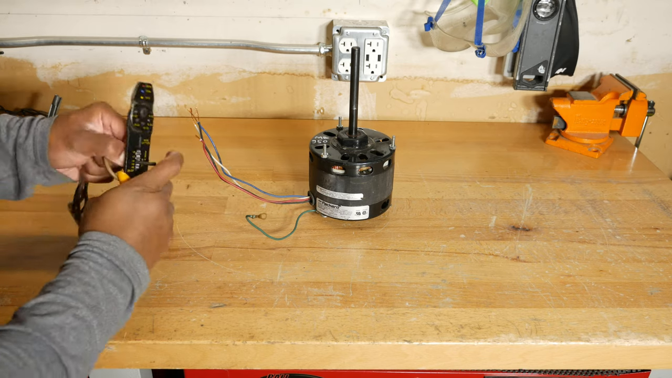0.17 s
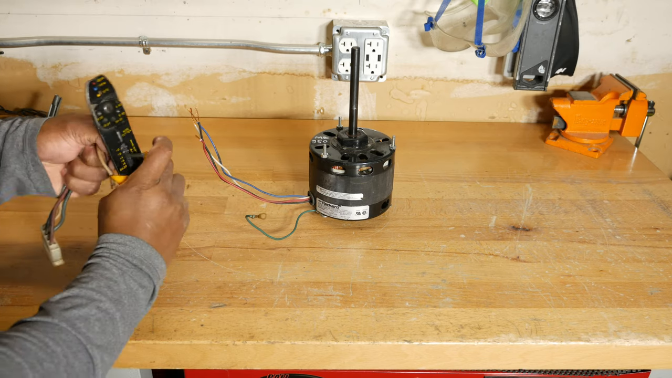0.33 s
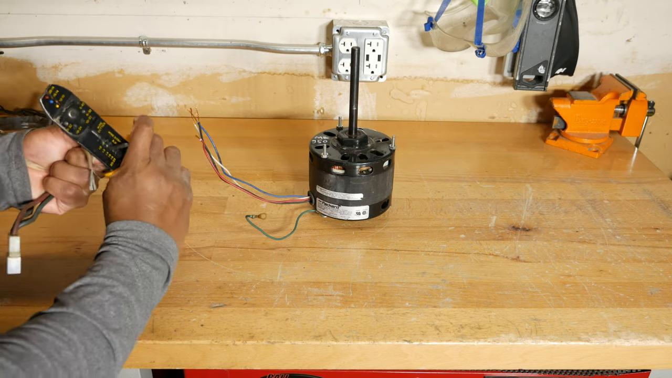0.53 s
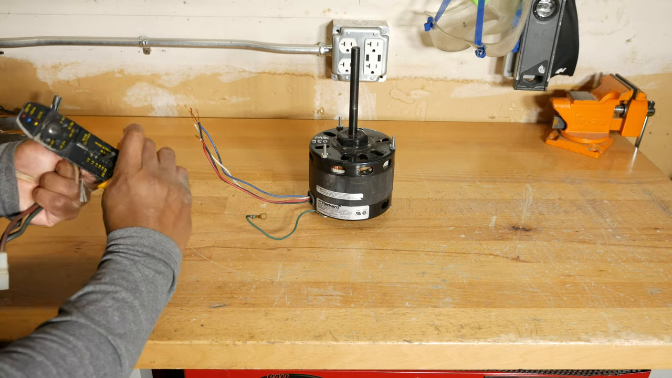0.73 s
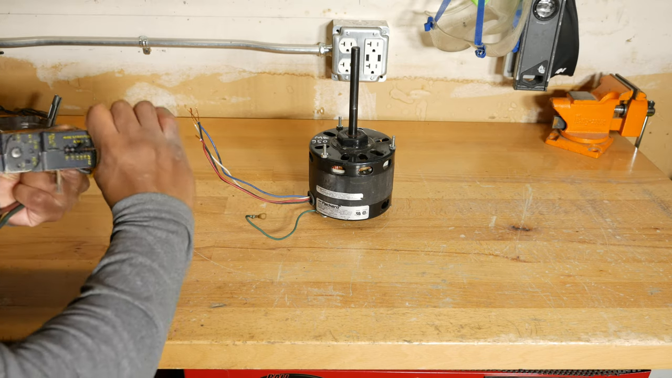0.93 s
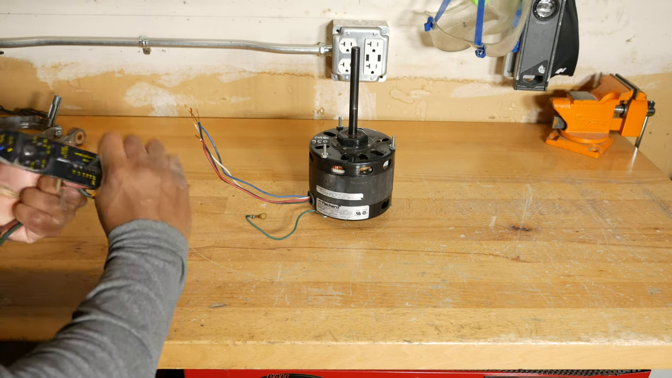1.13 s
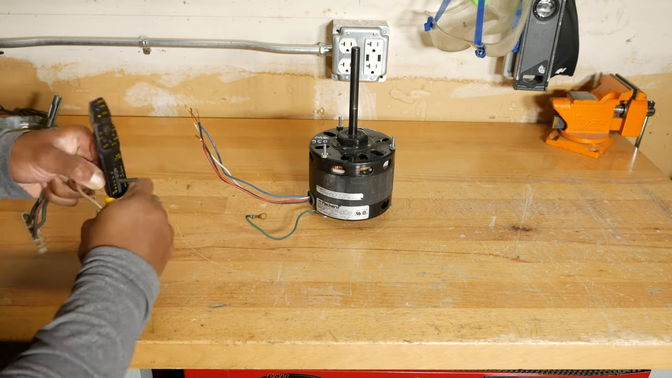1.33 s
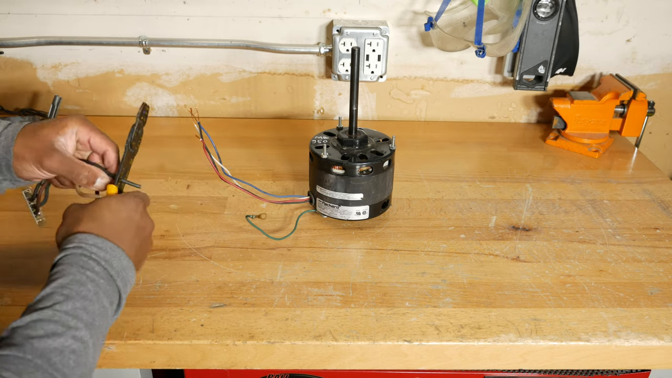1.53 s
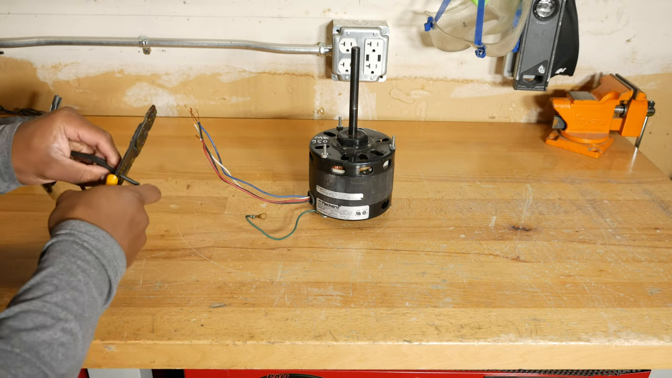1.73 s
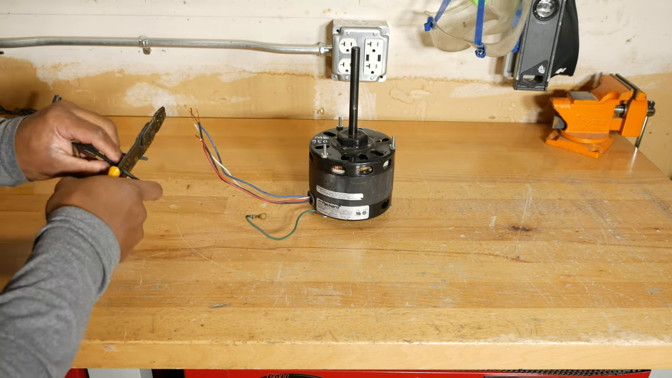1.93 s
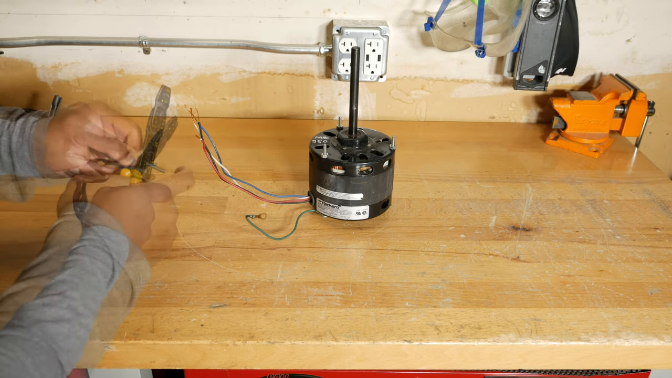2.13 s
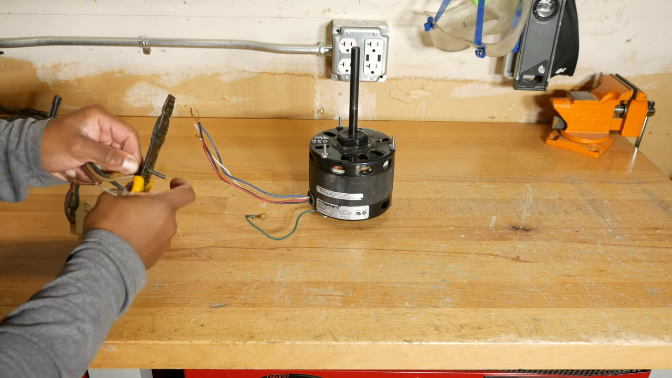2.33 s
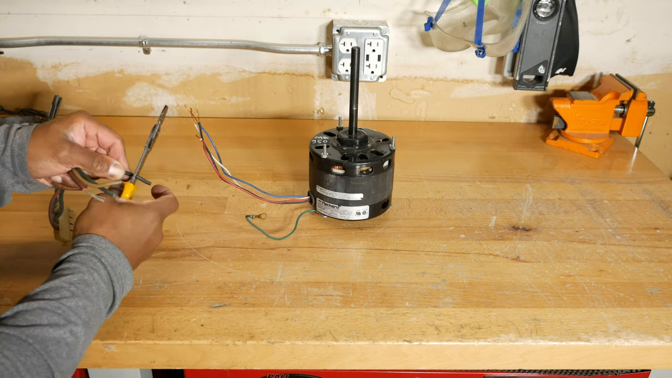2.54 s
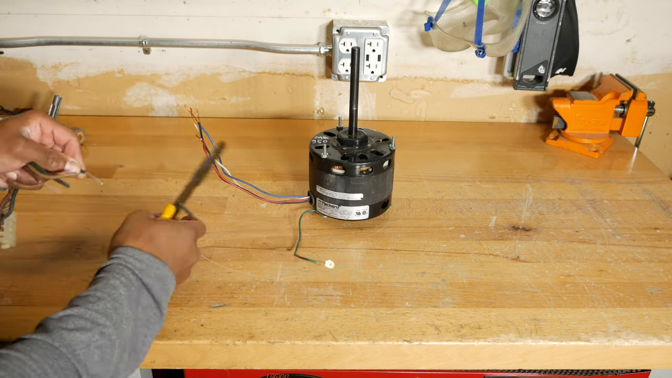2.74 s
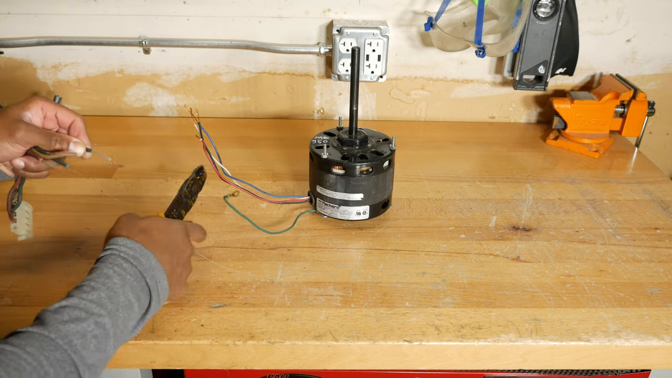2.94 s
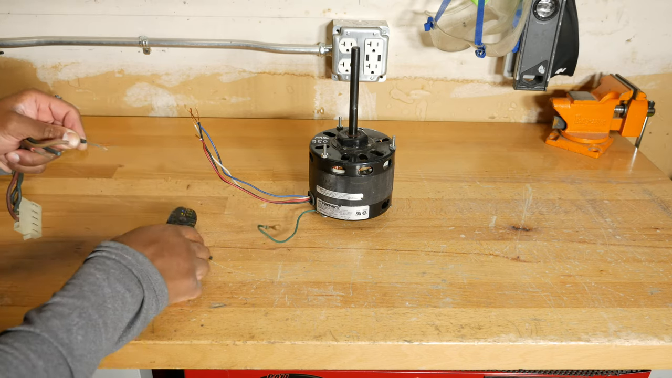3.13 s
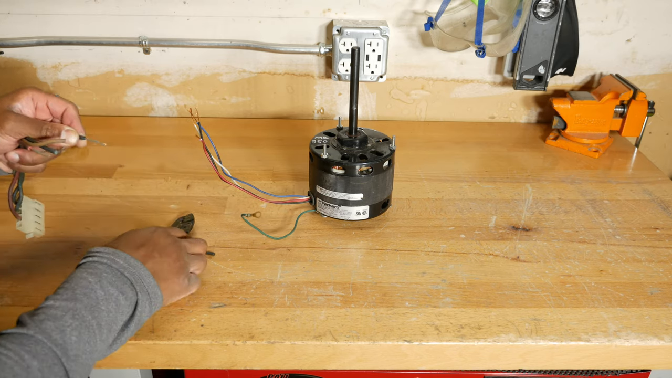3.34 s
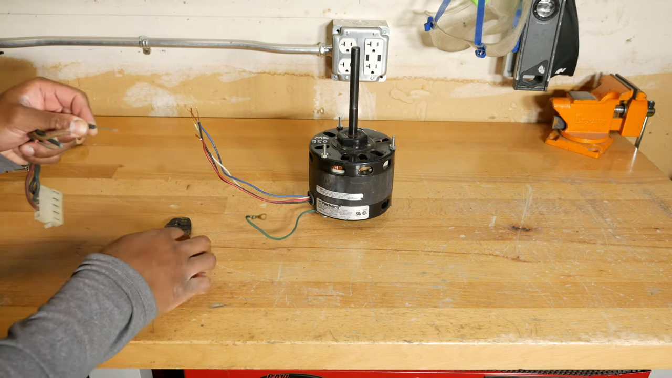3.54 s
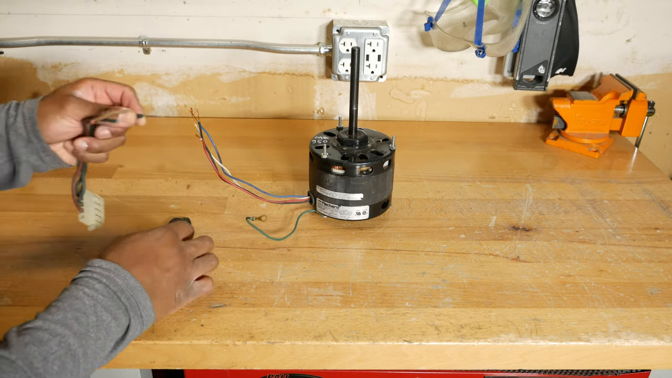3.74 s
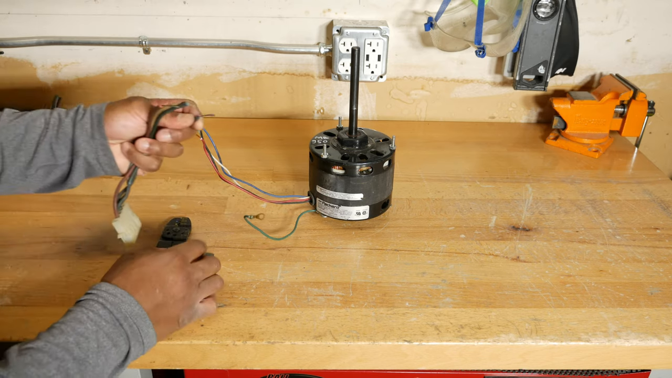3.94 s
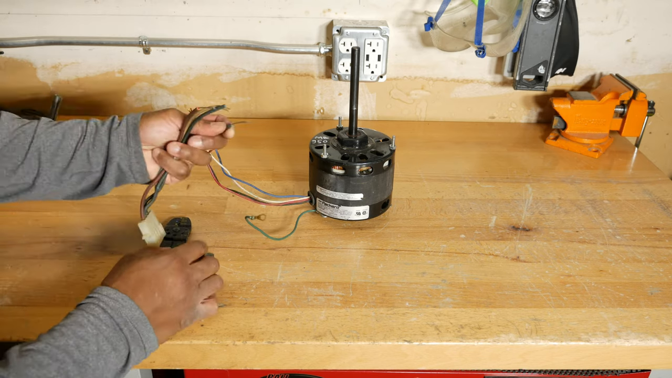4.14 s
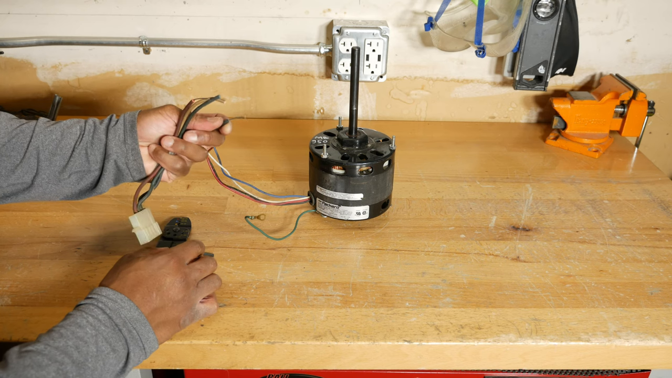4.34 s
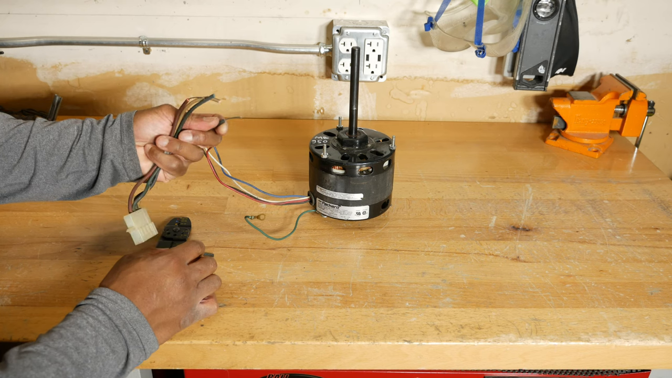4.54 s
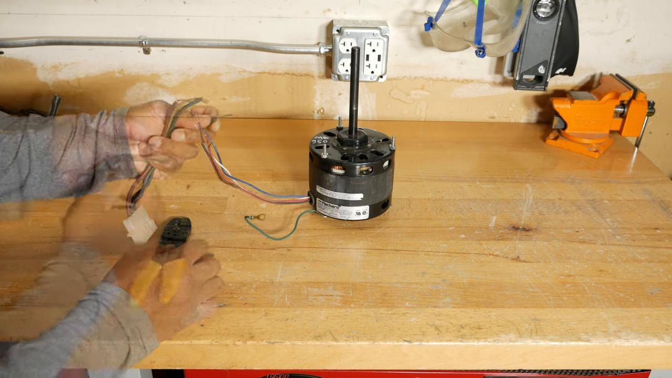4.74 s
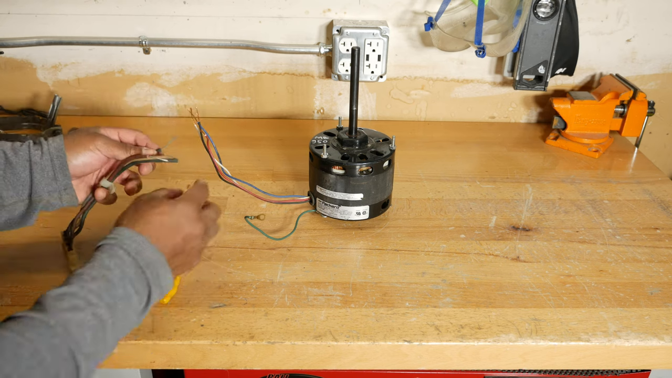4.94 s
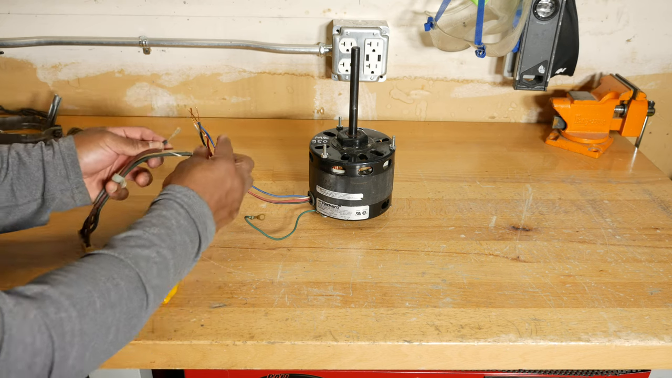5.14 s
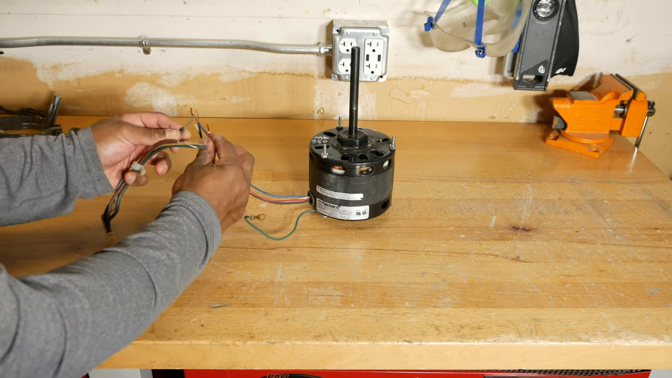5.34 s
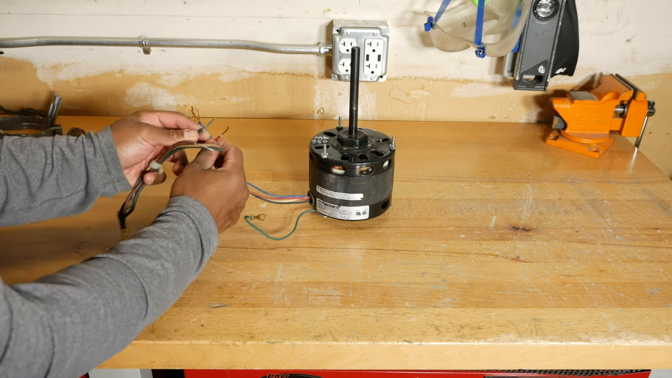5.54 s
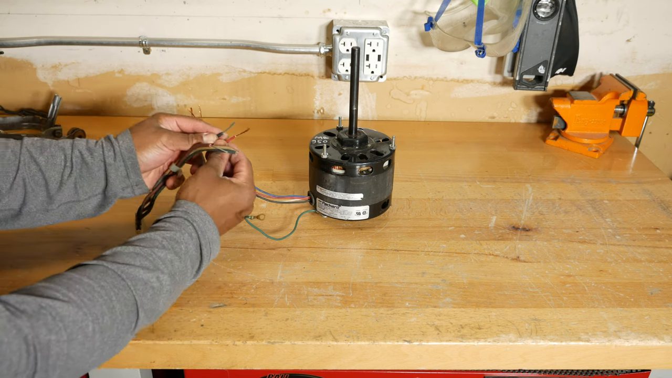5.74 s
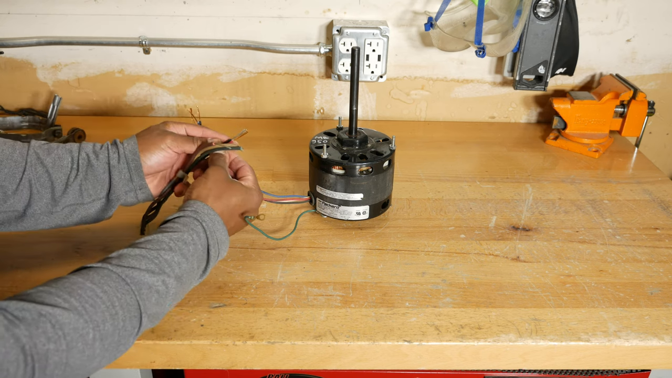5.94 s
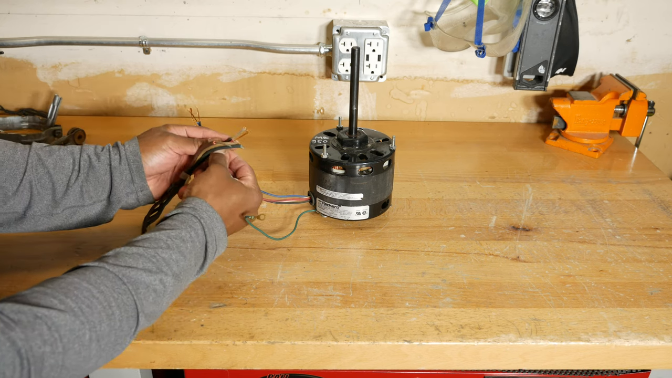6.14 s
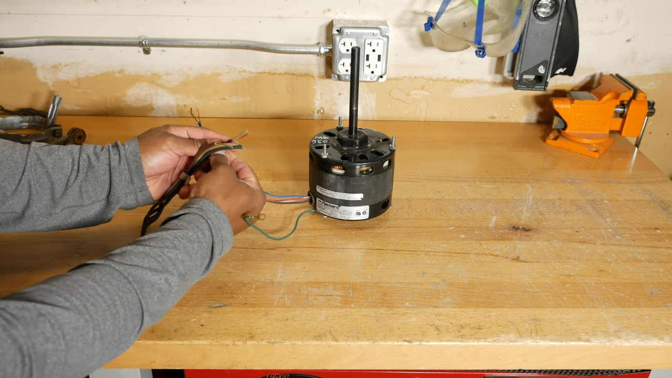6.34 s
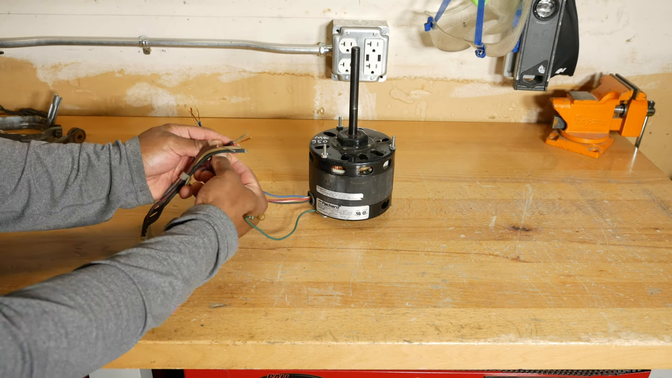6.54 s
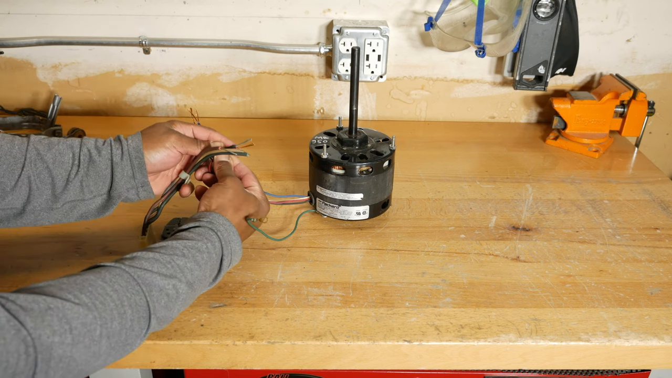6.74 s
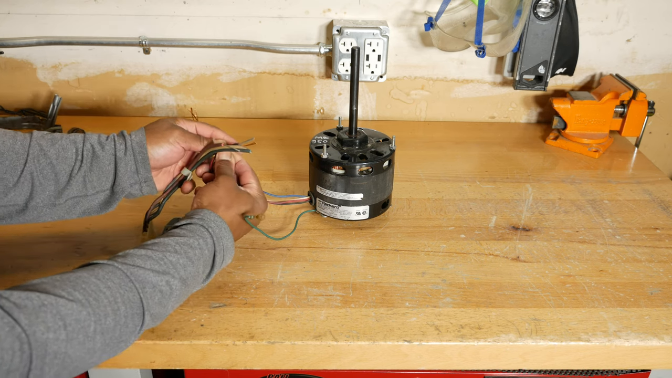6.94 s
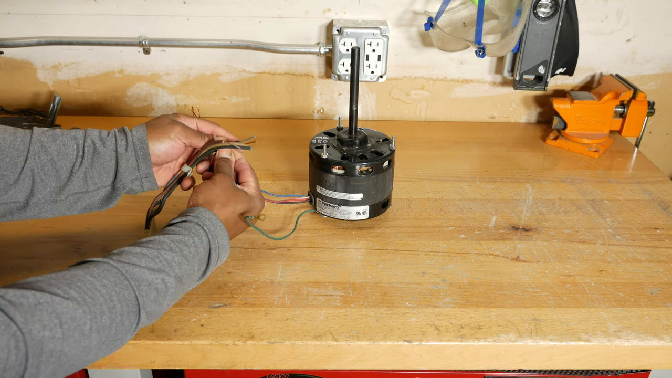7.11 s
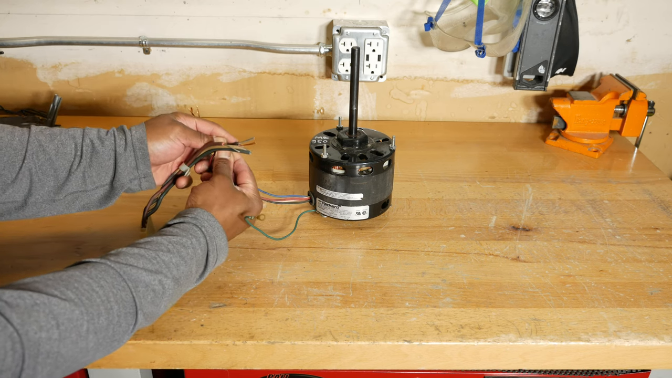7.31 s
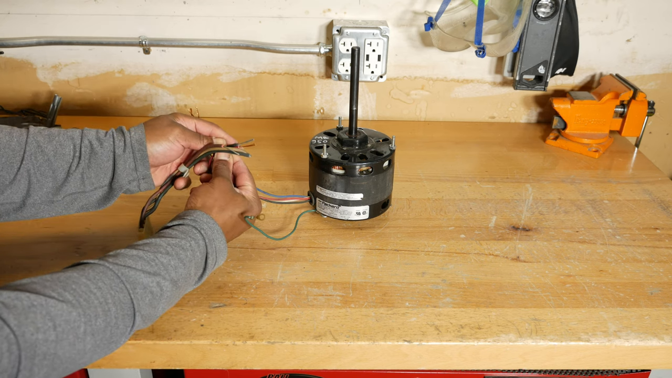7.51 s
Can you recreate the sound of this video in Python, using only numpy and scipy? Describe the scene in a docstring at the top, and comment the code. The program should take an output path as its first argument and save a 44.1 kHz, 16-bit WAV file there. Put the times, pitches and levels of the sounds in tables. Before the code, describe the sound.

Small metallic clicks of a wire stripper, loud knocks as it lands on a wooden bench, then sparse taps over faint workshop hum.

```python
"""A steel wire stripper clicks and snips over a grainy hiss and a soft workshop hum.
Each click is a tiny rattle that rings the steel; dragged wire adds short, gritty scrapes.
A hand thumps the wooden bench, the tool knocks on it and makes the top ring, and later
wire ends tap a motor's case. The wall behind the bench echoes each hit and the small room rings briefly."""
import sys
import numpy as np
from scipy import signal
from scipy.fft import rfft, irfft
from scipy.io import wavfile
from scipy.ndimage import uniform_filter1d

SR = 44100
rng = np.random.default_rng(int(sys.argv[2]) if len(sys.argv) > 2 else 0)


def to_wav(s):
    """Save 16-bit WAV."""
    ch = np.atleast_2d(s).T  # columns
    pcm = np.round(np.clip(ch, -1, 1) * 32767)  # PCM
    wavfile.write(sys.argv[1], SR, pcm.astype(np.int16))


N = 338245

# how loud the grainy hiss is over time: time_s, middle_db, treble_db
HISS_LEVEL = [(0, -62, -65.5), (.7, -66, -65), (.85, -56.5, -62), (1.4, -60, -63.5), (2.0, -65, -65.5),
              (2.8, -62, -65), (3.5, -46, -59), (3.62, -68.5, -80), (4.3, -70.5, -72), (4.76, -75, -78.5),
              (4.819, -65, -65), (5.05, -58.5, -62.5), (5.55, -62, -66), (5.94, -62.5, -66),
              (5.98, -90, -85), (6.5, -74, -75.5), (6.85, -66.5, -74), (7.67, -83, -78.5)]
# the quickly dying tones of a dry knock: pitch_hz, level_db, decay_s
KNOCK_TONES = [(330, -8, .025), (520, -5, .02), (690, -6, .016), (870, -1, .017), (1130, 0, .017),
               (1300, -4, .014), (1470, 0, .017), (1800, -4, .013), (2250, -7, .011)]


def gain(db):
    return 10 ** (np.asarray(db) / 20)


def fade(seconds, decay_s):
    """A fade that falls by 60 dB in decay_s."""
    return np.exp(-np.log(1000) * np.arange(int(seconds * SR)) / SR / max(decay_s, .002))


def band(x, low_hz, high_hz):
    edges_hz = [low_hz, min(high_hz, .45 * SR)]
    return signal.sosfilt(signal.butter(2, edges_hz, "bandpass", fs=SR, output="sos"), x)


def peak_to_one(x):
    return x / np.max(np.abs(x))


def add(track, start_s, sound):
    start = int(start_s * SR)
    track[start:start + len(sound)] += sound[:N - start]


def shaped_noise(spectrum):
    """Noise shaped by rows of pitch_hz, level_db."""
    hz, db = np.transpose(spectrum)
    bins_hz = np.arange(N // 2 + 1) * SR / N + 1
    curve = gain(np.interp(np.log(bins_hz), np.log(hz), db))
    return irfft(rfft(rng.standard_normal(N)) * curve, N)


def wander(steps_per_s):
    """A curve that glides from one random value to the next."""
    step = int(SR / steps_per_s)
    return 0.63 * uniform_filter1d(np.repeat(rng.standard_normal(N // step + 1), step), step)[:N]


def ring(tones, seconds, scatter_db, detune, tilt_db=0):
    """A struck object's fading tones, a little different each blow; tilt_db is per octave."""
    t = np.arange(int(seconds * SR)) / SR
    middle_hz = tones[len(tones) // 2][0]
    out = np.zeros(len(t))
    for hz, db, decay_s in tones:
        louder, sharper, direction = rng.standard_normal(3)
        level = gain(db + scatter_db * louder + tilt_db * np.log2(hz / middle_hz))
        wave = np.sin(2 * np.pi * hz * (1 + detune * sharper) * t)
        out += np.sign(direction) * level * fade(seconds, decay_s) * wave
    return out


def favour(tones, centre_hz, fall_db):
    """A blow favours tones near one pitch; those an octave away are fall_db weaker."""
    return [(hz, db - fall_db * np.log2(hz / centre_hz) ** 2, decay_s) for hz, db, decay_s in tones]


def grainy_hiss():
    """A grainy treble hiss that steps louder and softer."""
    time_s, middle_db, treble_db = np.transpose(HISS_LEVEL)
    t = np.arange(N) / SR
    grain = rng.standard_normal(N) * gain(1.8 * wander(150) + 3.9 * wander(20))
    middle = band(grain, 1600, 4800) + 0.35 * band(grain, 3243, 3280)
    treble = band(grain, 3700, 12000)
    return (middle / middle.std() * gain(np.interp(t, time_s, middle_db))
            + treble / treble.std() * gain(np.interp(t, time_s, treble_db)))


def workshop_hum():
    """The workshop's low, even noise, gently swelling and sinking."""
    # the colour of the noise: pitch_hz, level_db
    spectrum = [(15, -56.5), (25, -15.5), (70, -4.5), (153, 0.5), (405, -7), (560, -5), (641, -10.5),
                (775, -7), (1650, -18), (1940, -15), (4030, -25.5), (11600, -36), (16000, -43)]
    # its slow swell: time_s, level_db
    swell = [(0, -57), (1, -56), (1.8, -57), (2.05, -61), (2.2, -56.5), (4.4, -57), (4.75, -61),
             (5.049, -56), (7.67, -59)]
    noise = shaped_noise(spectrum)
    level_db = np.interp(np.arange(N) / SR, *np.transpose(swell)) + 1.03 * wander(7.5)
    return noise / noise.std() * gain(level_db)


def stereo_spread(hits):
    """A faint hiss and a short blur of each hit give slight stereo width."""
    # the colour of the faint hiss: pitch_hz, level_db
    spectrum = [(20, 0), (250, 3), (1000, -1), (3000, -2.5), (14500, -5), (15500, -20)]
    hiss = shaped_noise(spectrum)
    blur = rng.standard_normal(int(.02 * SR)) * fade(.02, .015)
    blurred_hits = signal.fftconvolve(hits, blur / np.linalg.norm(blur))[:N]
    time_s, _, treble_db = np.transpose(HISS_LEVEL)
    swell_db = np.interp(np.arange(N) / SR, time_s, treble_db) - treble_db.mean()
    hiss_db = treble_db.mean() - 3 + 0.4 * swell_db  # swells less than the grainy hiss
    return gain(-29.5) * blurred_hits + gain(hiss_db) * hiss / hiss.std()


def jaw_rattle(decay_s, grain_db):
    """A first blow, then a dying run of small, uneven contacts."""
    noise, roughness = rng.standard_normal((int(.08 * SR), 2)).T
    sizes = gain(grain_db * uniform_filter1d(roughness, size=40) * np.sqrt(40))
    contacts = noise * sizes * fade(.08, decay_s)
    contacts[0] = 5.7  # the first blow
    spectrum = rfft(contacts)
    evened = spectrum / uniform_filter1d(np.abs(spectrum), size=24)  # no pitch stands out
    return irfft(evened, len(contacts))[:len(contacts) // 2]


def jaw_click(level_db, pitch_hz, snap_db, edge_db, steel_db, rattle_ms):
    """One rattle gives the jaws' tick, the insulation's snap, a bright edge and ringing steel."""
    # the tones of the steel: pitch_hz, level_db, decay_s
    steel_tones = [(3335, -2, .02), (3560, -1, .016), (3800, 0, .018), (4050, -4, .012), (4500, -7, .01),
                   (5120, -3, .014), (5500, -3, .012), (6100, -4, .012), (7200, -8, .011), (8200, -9, .01),
                   (9500, -12, .01)]
    rattle = jaw_rattle(rattle_ms / 1000, grain_db=1.5)
    steel_ring = ring(favour(steel_tones, pitch_hz, fall_db=22), .05, scatter_db=-2.5, detune=0.025)
    steel = peak_to_one(signal.fftconvolve(rattle, steel_ring)[:len(rattle)])
    bands_hz = [(pitch_hz / 1.55, pitch_hz * 1.46), (1000, 3400), (6200, 15000)]
    jaws, snap, edge = (peak_to_one(band(band(rattle, low, high), low / 1.3, high * 1.43))
                        for low, high in bands_hz)
    return gain(level_db) * (jaws + gain(snap_db) * snap + gain(edge_db) * edge + gain(steel_db) * steel)


def stripper_clicks():
    """Steel jaws bite on wire, among stray ticks that are louder when the hiss is louder."""
    # the clear clicks: start_s, level_db, pitch_hz, snap_db, edge_db, steel_db, rattle_ms
    clicks = [(0.021, -28.5, 4530, -6, -22, -13, 12), (0.373, -44, 3710, -14, -12, -1, 16),
              (0.386, -49, 3860, 12.5, -17, -8, 19), (0.4655, -35.5, 6020, -23, -20, -11, 14),
              (0.744, -39.5, 6050, -7, 13.5, -3, 16), (0.786, -42, 4930, 2, -15, -21, 19),
              (0.905, -38, 3630, -10, -18, -12, 18), (0.998, -40, 3400, -9, -8, -16, 14),
              (1.15, -38, 3900, -12, -9, -6, 23), (1.171, -33, 4200, -25, -16, -11, 19),
              (1.221, -36, 3980, -10, -14, -12, 31), (1.258, -38, 3900, -17, -9, -11, 25),
              (1.288, -33.5, 5500, -27, -10, -16, 14), (1.3295, -27.5, 5500, -5.5, -13, -18, 32),
              (1.526, -41, 3750, -3, 0, -6, 19), (1.566, -35, 5950, -19, -18, -17, 19),
              (1.603, -33, 6840, -26, -11, -21, 19), (1.7005, -39, 4500, -31, 2, -13, 12),
              (1.7063, -25.5, 3500, -9, -21, -7, 3.2), (1.714, -33, 4200, -20, 1, -12, 13),
              (1.7241, -19.5, 6000, -17, -11, -28, 7.3), (1.821, -41, 3400, -16, 0, -21, 27),
              (2.132, -36.5, 3800, -30, -7, -4, 25), (2.143, -35, 3900, -28, -5, -17, 19),
              (2.185, -33, 4000, -39, -9, -15, 11), (2.2768, -31.5, 5480, -6.5, -14, 0, 14),
              (2.31, -53, 3760, 7, -12, -14, 17), (2.434, -40, 4200, -3, 0.5, -6, 19),
              (2.5724, -26, 4000, -6, 10.5, -14, 33), (2.576, -17.5, 5500, 1.5, -15, -5, 20),
              (2.597, -24, 5110, -17, -5, -8, 27), (2.6469, -12, 4300, -14, -1, -8, 20),
              (2.83, -40.5, 5000, -12.5, -12, -22.5, 26), (2.899, -29, 5500, -11, -7.5, -18, 17),
              (2.911, -30, 5500, -12.5, -12, -16, 22), (2.925, -34.5, 5500, -8.5, -6, -17, 13),
              (2.949, -15, 4500, -25.5, -11, -1, 16), (2.954, -21, 3680, -20.5, -20, -5.5, 7.8),
              (2.958, -26, 3870, -18, -14, -7, 25), (3.073, -28.5, 3800, 6.5, -18.5, -9.5, 46),
              (3.214, -5.5, 5300, -15, -8.5, -13, 32), (3.216, -0.5, 4020, -7, -10.5, -9.5, 20),
              (3.2245, -5.5, 4500, -13.5, -5.5, -9.5, 26), (3.233, -11, 4500, -2.5, -5, -6, 18),
              (3.38, -33, 3300, 7, -23, -10, 17), (3.4085, -20.5, 4000, 3.5, -21, -7.5, 41),
              (3.428, -6.5, 5400, -14, -4, -12.5, 23), (3.455, -23, 6000, 1, 0, -15.5, 45),
              (3.4697, -20, 5000, -3.5, -6, -18.5, 60), (3.649, -53.5, 6000, -5, 9, -18, 16),
              (3.711, -56, 6000, 4, 6, -16, 16), (3.74, -52, 3300, -6, 9, -12, 16),
              (3.7517, -40.5, 3240, -7, -10, -19, 18), (3.762, -38.5, 5430, -22, -10, -21, 23),
              (3.815, -42.5, 5000, 1.5, -7, -13, 18), (3.859, -38, 3420, -14, -4, -16, 20),
              (4.888, -34, 4280, 3, -1, -3, 17), (5.345, -37.5, 3750, 9, -11, -14, 16),
              (5.8095, -21.5, 5000, 0, -6.5, -18, 29), (5.8118, -19, 5250, -4.5, -17, 1, 28),
              (6.677, -44.5, 5000, -4, -3, -20, 18), (6.7268, -33, 4000, 0, -30, -13, 14),
              (6.7291, -34, 3800, 4, -35, -0.5, 22)]
    out = np.zeros(N)
    for start_s, *settings in clicks:
        add(out, start_s, jaw_click(*settings))
    ticks_per_s = 7.8
    time_s, hiss_db, _ = np.transpose(HISS_LEVEL)
    for when, size, octaves in rng.random((100, 3))[:int(ticks_per_s * N / SR)]:
        start_s = when * N / SR
        level_db = np.interp(start_s, time_s, hiss_db) + 14 + 3.5 * size
        tick = jaw_click(level_db, 3300 * 2 ** octaves, -9, -10, steel_db=-18.5, rattle_ms=14)
        add(out, start_s, tick)
    return out


def wall_echo(hits, delay_s=.004):
    """The wall behind the bench sends back a weaker, thinner copy of each hit."""
    return gain(-15.5) * band(np.roll(hits, int(delay_s * SR)), 210, 11000)


def room_ring(hits):
    """A quick crowd of near echoes, then a tail that dies sooner in the treble."""
    # the room's ring, octave-wide bands: pitch_hz, decay_s, level_db
    room_bands = [(150, 0.5, -25), (480, 0.39, -19.5), (886.4, 0.55, -23), (1930, 0.43, -20),
                  (3540, 0.34, -22), (6995, 0.3, -15.5), (13000, .25, -21.5)]
    half_octave = np.sqrt(2)
    tail = np.zeros(SR // 2)
    for hz, decay_s, db in room_bands:
        noise = band(rng.standard_normal(SR // 2), hz / half_octave, hz * half_octave)
        tail += gain(db) * noise * fade(.5, decay_s) / np.sqrt(hz / 30)
    build_up = 1 - fade(.5, 0.043)
    near_echoes = 1 + gain(4.5) * fade(.5, 0.078)
    return signal.fftconvolve(hits, tail * build_up * near_echoes)[:N]


def wire_scrapes():
    """Wire drags along jaws or fingers in many uneven slips, fading in and out."""
    # the drags: start_s, length_s, level_db, pitch_hz
    drags = [(0.371, 0.036, -53.5, 3700), (0.427, 0.038, -54, 4140), (0.77, 0.11, -59.5, 7000),
             (1.518, 0.04, -59, 4000), (1.543, 0.047, -50, 6600), (1.596, 0.032, -52.5, 7850),
             (1.719, 0.094, -50.5, 4900), (2.279, 0.037, -54, 4000), (2.822, 0.033, -62, 4970),
             (4.201, 0.11, -60, 9900), (4.9, 0.047, -53.5, 4950), (6.731, 0.088, -58, 3515)]
    out = np.zeros(N)
    for start_s, length_s, level_db, pitch_hz in drags:
        noise, roughness = rng.standard_normal((2, SR // 5))[:, :int(length_s * SR)]
        slips = noise * gain(24.05 * uniform_filter1d(roughness, size=49))
        grit = band(slips, pitch_hz / 3.5, pitch_hz * 1.62)
        add(out, start_s, gain(level_db) * grit / grit.std() * np.sqrt(np.hanning(len(grit))))
    return out


def bench_thud(seconds, scatter_db, detune, tilt_db):
    """The deep note of the struck bench top."""
    # the top's low tones: pitch_hz, level_db, decay_s
    low_tones = [(66.16, -7, 0.14), (103, -5, 0.22), (150, -7, 0.17), (182, 0, 0.13), (215, -3.5, 0.3),
                 (250, -4.5, .12), (292.1, -5, 0.36), (334, -5, 0.14), (386, -4.5, 0.18), (445, -2, .12)]
    return ring(low_tones, seconds, scatter_db, detune, tilt_db)


def hand_thumps(contact_s=0.0018):
    """A soft hand or forearm pushes slowly, so only the bench's low tones answer."""
    # the soft landings: start_s, peak_db, tilt_db (per octave)
    thumps = [(1.0, -46.5, 4), (2.66, -38, -2.5), (2.68, -36.5, -3), (2.709, -43, -3.5), (7.075, -44, 5)]
    out = np.zeros(N)
    push = np.hanning(int(contact_s * SR) + 3)
    for start_s, peak_db, tilt_db in thumps:
        thud = bench_thud(.3, scatter_db=1.5, detune=0.071, tilt_db=tilt_db)
        add(out, start_s, gain(peak_db) * peak_to_one(np.convolve(thud, push)))
    return out


def quick_repeat(start_s, level_db):
    """Each knock is heard again, softer, about 4 ms later: rows of start_s, level_db."""
    return [(start_s, level_db - 0.5), (start_s + 0.00376, level_db - 3.5)]


def bench_knocks():
    """The tool hits the bench: a dry knock, the lasting ring of the wood and a low thud."""
    # the blows: start_s, level_db, pitch_hz, ring_db, thud_db
    knocks = [(1.329, -40.5, 520, -24, -19), (2.5768, -26, 700, -29.5, -18.5), (3.065, -26, 1607, -16, -39),
              (3.2137, -12.5, 903, -11, -9.5), (3.221, -16, 420, -11, -10.5),
              (3.235, -4.5, 1500, -14, -23.5), (3.381, -13.5, 1220, -7, -38.5),
              (3.4087, -2.5, 942, -17.5, -21.5), (3.421, -13.5, 1200, -12.5, -23),
              (3.435, -13, 483, -16, -9.5), (3.4695, -3.5, 1000, -14.5, -20),
              (3.492, -17.5, 913, -11.5, -18.5)]
    # the top's lasting tones: pitch_hz, level_db, decay_s
    wood_tones = [(519, 2, 0.3), (625, -6, .22), (650, -4.5, .2), (723.5, -9.5, 0.78), (793, -7.5, 0.44),
                  (877, -2, 0.33), (950, -4.5, .2), (989, -5.5, 0.11), (1055, -5.5, 0.11),
                  (1146, -8.5, 0.253), (1120, -5, 0.23), (1173, 0.5, .22), (1204, -12, 0.13),
                  (1358, -10.5, .2), (1393, -5, .15), (1388, -1, .15), (1463, -7, 0.063), (1615, -8, .13),
                  (1753, -10.5, 0.19), (1779, -9.5, .1), (1760, -9, .1), (2087, -6.5, .1)]
    out = np.zeros(N)
    for start_s, level_db, pitch_hz, ring_db, thud_db in knocks:
        for knock_s, knock_db in quick_repeat(start_s, level_db):
            knock = ring(favour(KNOCK_TONES, pitch_hz, fall_db=7), 0.058, scatter_db=1.5, detune=0.016)
            add(out, knock_s, gain(knock_db) * peak_to_one(band(knock, 200, 3900)))
        wood = ring(favour(wood_tones, pitch_hz, fall_db=4), 0.55, scatter_db=-0.3, detune=0.0022)
        add(out, start_s, gain(level_db + ring_db) * peak_to_one(wood))
        thud = bench_thud(.35, scatter_db=2, detune=0.036, tilt_db=2.6)
        add(out, start_s, gain(level_db + thud_db) * peak_to_one(thud))
    return out


def motor_taps(pitch_hz=1260):
    """Wire ends and knuckles tap the motor: a dry knock and the thin ring of its case."""
    # the taps: start_s, level_db, ring_db
    taps = [(4.8857, -18, -25), (4.888, -11.5, -10), (4.904, -23.5, -1.5), (5.345, -18, -13),
            (5.3632, -33, -0.5), (5.545, -54, 11), (5.664, -60, 12), (5.714, -47, 7), (5.745, -55.5, 12),
            (5.774, -57, 14), (5.81, -30, -1.5), (5.853, -52, 4)]
    # the tones of the case: pitch_hz, level_db, decay_s
    case_tones = [(557, -15.5, 0.13), (880, -1, 0.14), (928, -2.5, 0.12), (1050, -10, 0.13),
                  (1135, -6, 0.16), (1505, -17, 0.13), (1623, -12, 0.12), (1880, -26, .09),
                  (2050, -14, 0.12)]
    out = np.zeros(N)
    for start_s, level_db, ring_db in taps:
        for knock_s, knock_db in quick_repeat(start_s, level_db):
            knock = ring(favour(KNOCK_TONES, pitch_hz, fall_db=12), 0.064, scatter_db=-0.6, detune=0.014)
            add(out, knock_s, gain(knock_db) * peak_to_one(band(knock, 210, 3100)))
        case = ring(case_tones, .4, scatter_db=3.5, detune=0.0011)
        add(out, start_s, gain(level_db + ring_db) * peak_to_one(case))
    return out


def scene():
    """Mix the work at the bench, its echoes and the background into left and right."""
    tool = band(stripper_clicks() + bench_knocks(), 82, 19000)
    taps = motor_taps()
    bench_work = tool + hand_thumps() + wire_scrapes()
    hits = bench_work + taps
    room = room_ring(bench_work + gain(-5) * taps)  # the motor is close, so less of it is room
    centre = hits + wall_echo(hits) + room + grainy_hiss() + workshop_hum()
    side = stereo_spread(band(hits, 1500, 16000))
    return np.array([centre + side, centre - side])


def record(dry):
    """Deep bass and the highest treble are cut; loud peaks are rounded."""
    no_rumble = signal.sosfilt(signal.butter(2, 35, "highpass", fs=SR, output="sos"), dry)
    rounded = np.tanh(1.055 * no_rumble) / 1.142
    softened = signal.sosfilt(signal.butter(8, 15300, fs=SR, output="sos"), rounded)
    return signal.sosfilt(signal.ellip(10, .2, 80, 16500, fs=SR, output="sos"), softened)


dry = scene()
out = record(dry)
to_wav(out)
```